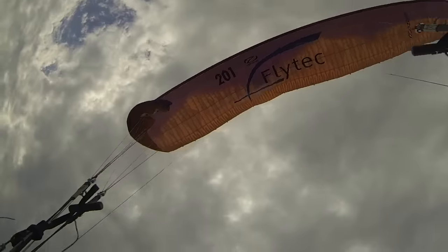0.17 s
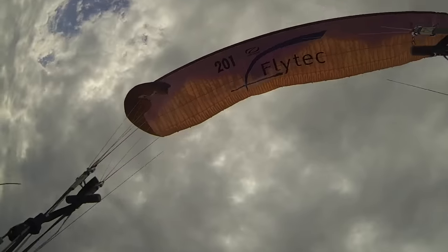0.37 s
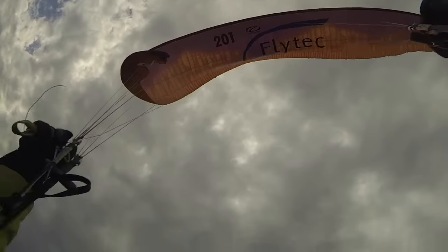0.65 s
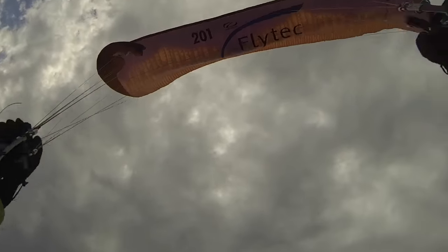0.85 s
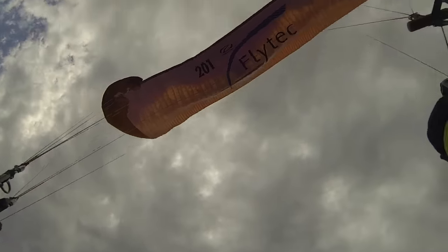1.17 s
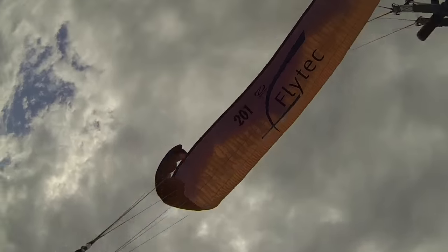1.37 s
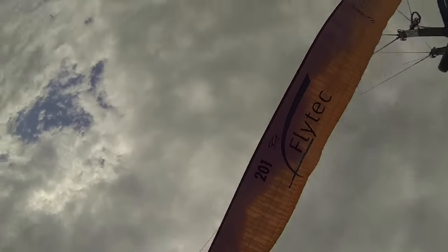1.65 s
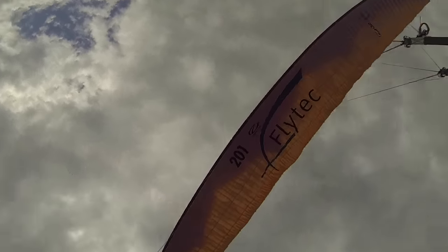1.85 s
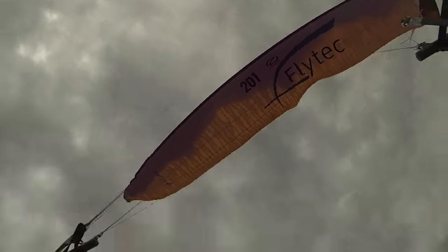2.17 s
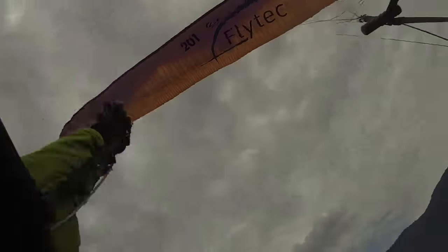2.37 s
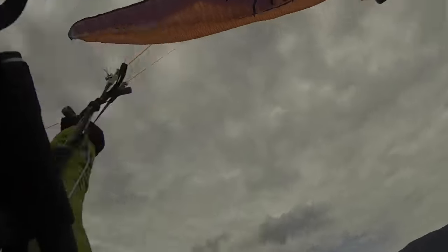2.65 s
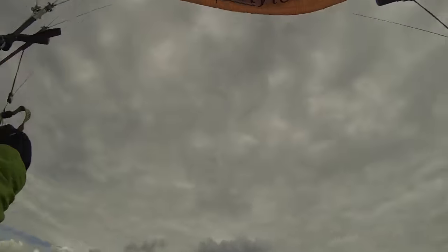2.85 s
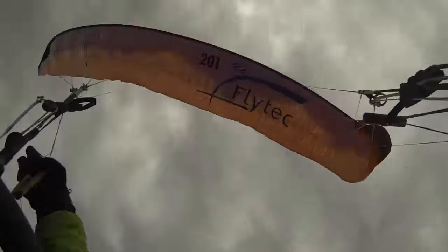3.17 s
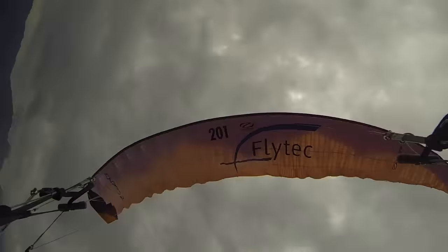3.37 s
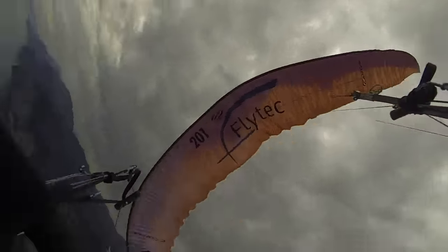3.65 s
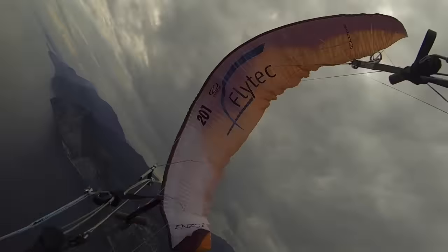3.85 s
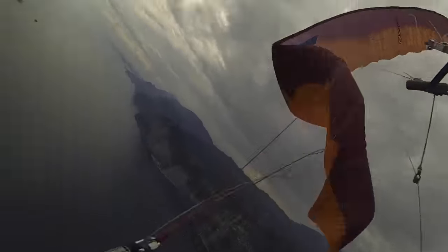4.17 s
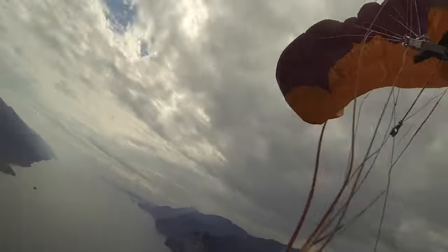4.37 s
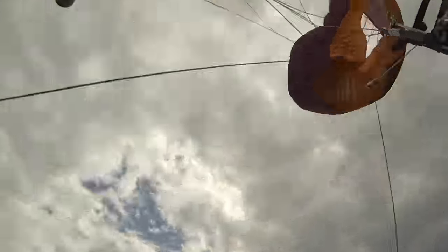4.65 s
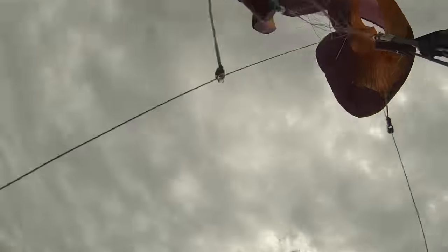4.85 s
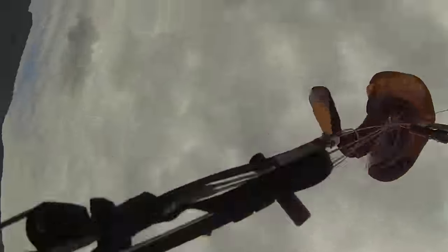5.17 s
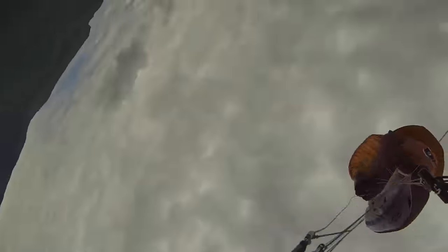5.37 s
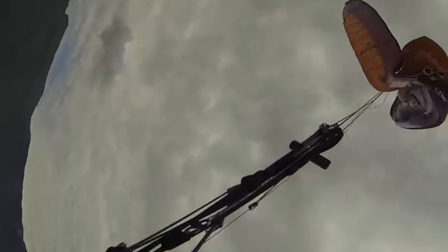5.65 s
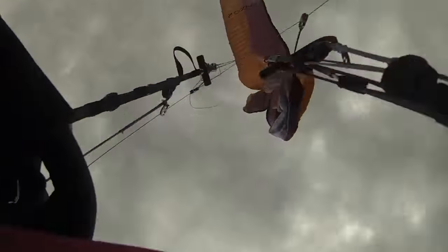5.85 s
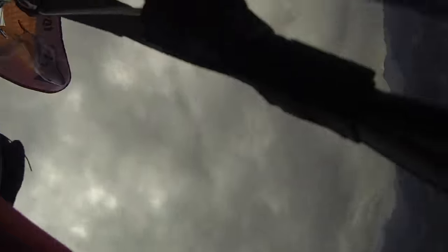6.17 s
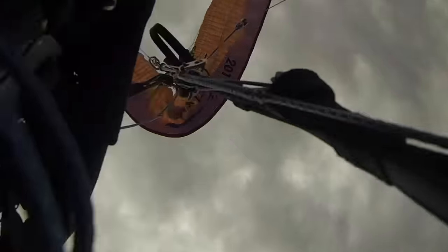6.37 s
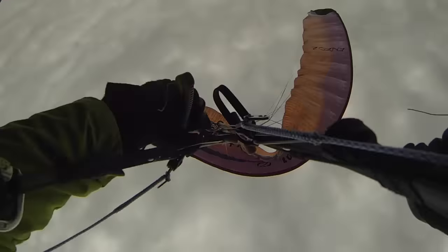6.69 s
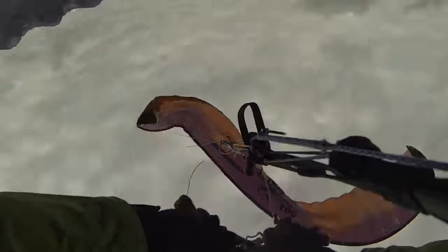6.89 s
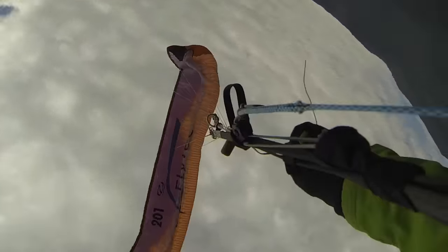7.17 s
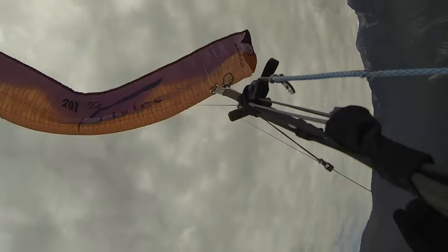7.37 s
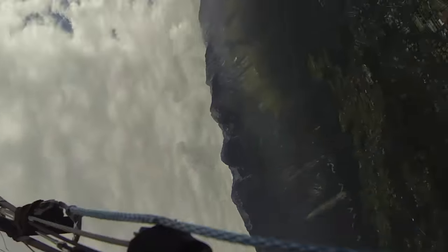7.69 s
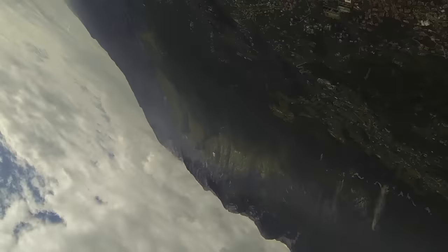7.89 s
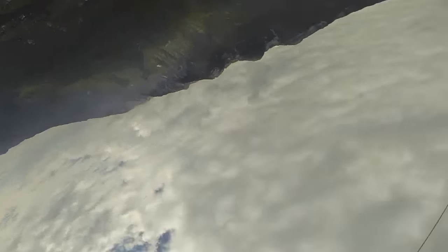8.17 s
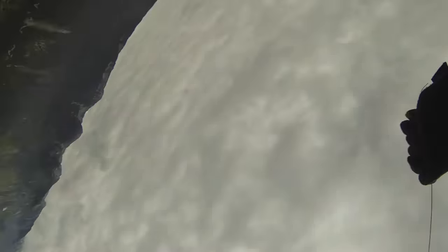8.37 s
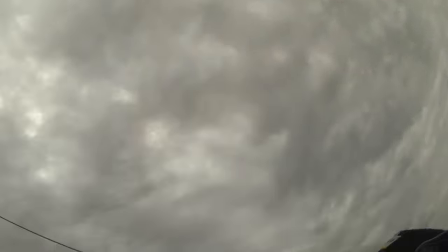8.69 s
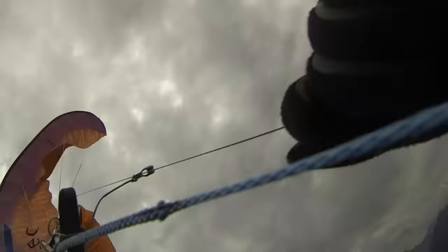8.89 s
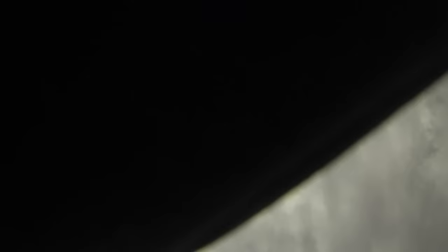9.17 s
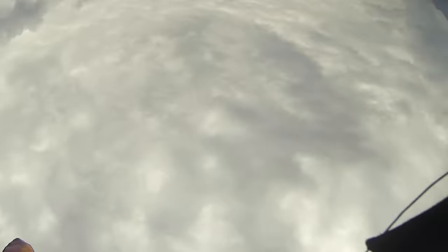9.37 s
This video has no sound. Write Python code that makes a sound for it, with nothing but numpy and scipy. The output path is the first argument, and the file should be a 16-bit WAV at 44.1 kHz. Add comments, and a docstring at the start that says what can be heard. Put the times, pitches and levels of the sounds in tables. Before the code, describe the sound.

Heard from a microphone in a plastic case on a paraglider pilot in open air. Wind rumbles and buffets throughout, its hollow rush surging and dropping. In the first two seconds only a few small groups of dull cloth snaps knock the case, around 0.1-0.3, 1 and 1.7 s, the last with a brief low drone. At 2.4 s a hard snap starts a dense flurry, with short gliding squeaks and scrapes near 2.7 s and a roaring, hissier wind. From 3 s slack cloth flutters in uneven flicks between clustered cracks; a hum swells at 3.7 s. Snaps thin out between 4.3 and 5.5 s, with another drone at 5.3 s, then crowd rapidly from 5.5 to 7 s. Heavy, sharp cracks continue to 9.5 s, some distorted or briefly ringing, with a squeak at 8 s and low drones from 8.2 to 9.1 s.

```python
"""A paraglider wing collapses and flogs in rough air, heard by a microphone in a plastic case on the pilot.
Wind, as coloured noise, buffets the case and rushes throughout; from the start, cloth snaps taut now and then,
each snap a push that excites resonances. The cavity's hum swells into drones, first at about 1.7 s. From about
2.4 s the snaps crowd together and the hardest overload the microphone; rubs follow as gliding squeaks and
scrapes, some snaps leave decaying tones, and from about 3 s slack cloth flutters in trains of uneven flicks."""
import sys
import numpy as np
from scipy import signal
from scipy.fft import rfft, irfft, next_fast_len
from scipy.io import wavfile
from scipy.ndimage import map_coordinates

SR = 44100
rng = np.random.default_rng(int(sys.argv[2]) if len(sys.argv) > 2 else 0)


def master_out(mix):
    """Clip the mix to full scale and print it as 16-bit PCM to the path in sys.argv[1]."""
    frames = np.transpose(np.atleast_2d(mix))
    ceiling = np.clip(frames, -1, 1)
    pcm = np.round(ceiling * 32767).astype(np.int16)
    wavfile.write(sys.argv[1], SR, pcm)


N = 420273
T = np.arange(N) / SR  # time [s]
HIT = 4096  # length of one blow [samples]
AGE = np.arange(HIT) / SR  # time since a blow [s]

# airspeed past the case: (time [s], level of the rush [dB])
AIRSPEED = [(0.0, -15), (0.2, -26.5), (0.45, -39), (0.92, -27.5), (1.35, -44), (1.49, -34.5), (1.82, -21.5),
            (1.93, -48), (2.45, -30.5), (4.2, -39.5), (4.4, -24), (4.8, -26), (4.92, -31), (5.6, -21.5),
            (6.05, -35), (6.2, -24.5), (6.38, -38.5), (6.8, -27), (7.05, -43.5), (7.52, -22.5), (7.7, -51),
            (7.9, -35), (8.5, -39.5), (8.68, -31), (9.08, -53), (9.53, -27.5)]
# turbulence on the case: (time [s], level of the buffeting [dB])
GUSTS = [(0, -18.5), (1.0, -17.5), (1.38, -23.5), (1.58, -13.5), (2.05, -23.5), (3.35, -19.5), (3.85, -26),
         (4.7, -20.5), (6.25, -23.5), (7.1, -34), (7.4, -25), (9.53, -28)]
# the turning airstream: (time [s], drone pitch [Hz], share of glancing flow [0-1])
FLOW = [(2.4, 135, 0.18), (2.48, 132.9, 0.68), (2.7, 134.1, 0.9), (2.78, 135.4, 0.27), (5.7, 136, 0.17),
        (6.3, 114.7, 0.48), (8.3, 119, 0.51), (8.6, 102.5, 0.61)]
# air whistling across the case's rim: (time [s], level before the eddies [dB])
WHISTLE = [(0, -54), (0.45, -61.5), (2.3, -65), (2.5, -45), (2.88, -42.5), (3.0, -33), (3.22, -46),
           (4.35, -57), (4.5, -49.5), (5.5, -57.5), (8.5, -58), (9.4, -50.5)]
# the cavity catches the flow and drones: (start [s], end [s], level at the crest of the arch [dB])
DRONES = [(1.711, 1.947, -21), (3.653, 3.87, -15.5), (5.213, 5.466, -18.5), (8.222, 8.39, -17.5),
          (8.418, 9.1, -21)]
# noise spectra: (frequency [Hz], relative level [dB])
BUFFET_SPECTRUM = [(10, -23), (22, -5), (31, 6.5), (42, -6), (80, -7.5), (160, -16), (400, -81.5)]
RUSH_SPECTRUM = [(100, -22.5), (200, -1.5), (330, -8), (475, 2), (630, -10), (830, -31), (1280, -21),
                 (1700, -68)]
HISS_SPECTRUM = [(1000, 1.5), (2200, -1.5), (4000, -6.5), (7000, -25.5), (14000, -41.5)]
# spectrum of the sharp edge of a snap or flick: (frequency [Hz], relative level [dB])
EDGE_SPECTRUM = [(2000, -25), (2900, 0), (3700, 3), (4400, -3), (6000, -10.5), (7500, -24), (14000, -29)]
# gear rubbing across the case: (start [s], end [s], level [dB], first pitch [Hz], last pitch [Hz])
RUBS = [(2.628, 2.656, -14.5, 1411, 1035), (2.685, 2.737, -30, 1720, 1180), (2.741, 2.756, -27, 1110, 810),
        (3.994, 4.014, -29.5, 1195, 937), (7.981, 8, -14.5, 1150, 1990)]
# case wall or small fitting left ringing by a snap: (time [s], pitch [Hz], level [dB], t60 [s])
RINGS = [(2.377, 1840, -25.5, 0.086), (4.216, 2014, -13, 0.046), (4.853, 2014, -13.5, 0.037),
         (6.408, 1490, -17, 0.025), (7.38, 3630, -13.5, 0.019), (8.36, 3850, -14, 0.019),
         (8.906, 1740, 0.5, 0.011), (9.408, 2840, -29, 0.045)]
# bursts of flutter: (start [s], end [s], level [dB], pitch of the crackle [Hz])
FLUTTER = [(3.046, 3.191, -23, 1720), (3.271, 3.452, -32, 1220), (3.528, 3.6, -36, 1600),
           (3.805, 3.845, -28, 1900), (5.558, 5.641, -23.5, 1250), (5.661, 5.685, -23, 1310),
           (5.716, 5.779, -28, 1320), (5.855, 5.897, -24, 1310), (5.916, 6.016, -28, 1300),
           (6.162, 6.29, -33, 1330), (6.79, 6.856, -30.5, 2350), (7.55, 7.61, -22, 1284),
           (8.634, 8.701, -28, 1520), (9.157, 9.237, -34.5, 1710)]
# cloth and lines snapping taut, levels before the adjustments for flow and hardness:
# (time [s], level of the blow to the case [dB], level of the crack [dB], pitch of the crack [Hz])
SNAPS = [(0.052, -17, -35, 1300), (0.232, -13.5, -26, 1400), (0.328, -16.5, -24.5, 1290),
         (0.926, -9.5, -22, 1140), (0.974, -21.5, -31.5, 1300), (1.025, -13.5, -36, 1290),
         (1.687, -12.5, -48.5, 1240), (1.731, -14, -30, 1320), (1.767, -15, -25, 1280),
         (1.842, -16.5, -26, 1330), (2.36, -1.5, -10.5, 1754), (2.378, -17.5, -15, 2090),
         (2.427, -13, -26, 1310), (2.469, -14, -16.5, 1740), (2.504, -30, -24.5, 2180),
         (2.511, -22.5, -26, 2030), (2.535, -36, -21.5, 1650), (2.56, -18, -19.5, 1260),
         (2.589, -22.5, -16, 1290), (2.66, -12.5, -12, 1820), (3.019, -8.5, -17, 1734),
         (3.029, -9.5, -16, 1674), (3.055, -19, -24, 1740), (3.243, -14, -18.5, 1730),
         (3.281, -14, -18, 1960), (3.308, -21, -23.5, 1710), (3.476, -21, -23.5, 1960),
         (3.512, -14, -24, 2370), (3.655, -7.5, -26.5, 1560), (3.686, -6.5, -25, 1670),
         (3.728, -9.5, -19, 1970), (3.798, -6, -16, 1916), (3.828, -11.5, -19, 1960),
         (3.882, -13, -14.5, 1810), (4.121, -8.5, -20, 1830), (4.201, -11.5, -15, 1850),
         (4.209, -9, -15, 1910), (4.214, -12.5, -22, 1880), (4.852, -8.5, -10, 2120),
         (4.958, -9, -16, 1900), (5.538, -5.5, -14.5, 1850), (5.553, -11, -18.5, 1910),
         (5.703, -21, -20, 2040), (5.713, -12.5, -17, 1880), (5.75, -14, -18, 2040),
         (5.767, -24, -16.5, 1880), (5.814, -9, -13.5, 1930), (5.831, -7.5, -19, 1480),
         (5.874, -10.5, -16, 2070), (5.945, -11.5, -23.5, 2050), (5.977, -7.5, -15.5, 1580),
         (5.983, -19, -17.5, 2040), (6.019, -10, -10, 1384), (6.155, -30, -15.5, 1720),
         (6.197, -12.5, -10, 1836), (6.237, -14, -14, 2020), (6.26, -17, -18, 1610),
         (6.305, -13.5, -15.5, 2085), (6.363, -30, -19, 1406), (6.396, -21, -15, 1390),
         (6.408, -19, -18, 1255), (6.485, -8.5, -17.5, 2050), (6.498, -12, -22.5, 2100),
         (6.513, -12.5, -29, 1390), (6.534, -9.5, -20, 1900), (6.617, -10.5, -16.5, 2400),
         (6.636, -10, -17, 2320), (6.644, -17, -20.5, 2470), (6.661, -14, -21.5, 1980),
         (6.684, -25, -29.5, 2570), (6.71, -18, -21.5, 2620), (6.732, -12.5, -19.5, 2060),
         (6.832, -18, -28, 2550), (6.854, -14, -22.5, 2460), (6.869, -13.5, -20.5, 2660),
         (6.921, -12.5, -23.5, 1660), (6.976, -11.5, -36, 1530), (7.114, -10.5, -18, 1190),
         (7.224, -10, -10.5, 1615), (7.324, -9, -11.5, 1985), (7.379, -14, -16.5, 2170),
         (7.509, -4, -14.5, 1590), (7.606, -7, -12.5, 1440), (7.618, -25, -15.5, 1690),
         (7.63, -28, -14.5, 1650), (7.65, -21, -16, 1810), (7.772, -8, -11.5, 1730),
         (7.802, -14, -14, 1880), (7.953, -8, -9, 1855), (7.975, -8, -9.5, 1610),
         (8.178, -9.5, -13.5, 1580), (8.189, -15, -20, 2230), (8.207, -21, -22, 1520),
         (8.25, -19, -24.5, 1790), (8.354, -11, -25, 3000), (8.376, -16, -18.5, 1920),
         (8.626, -6.5, -13.5, 1695), (8.703, -18, -25, 1750), (8.778, -8.5, -11, 1600),
         (8.841, -18, -26, 1321), (8.859, -18.5, -15.5, 1310), (8.907, -18.5, -19, 1610),
         (8.95, -10.5, -17.5, 1520), (8.97, -16, -14, 1750), (9.031, -15, -19.5, 1570),
         (9.047, -19, -23, 1610), (9.142, -8.5, -10.5, 1800), (9.209, -12.5, -18.5, 2140),
         (9.277, -19.5, -21.5, 1790), (9.289, -7.5, -13.5, 1730), (9.342, -23, -26.5, 2044),
         (9.41, -14.5, -23, 1970), (9.488, -9, -14.5, 1950)]
# case resonances below the top one: (frequency [Hz], width of a single pass [Hz], level [dB])
CASE = [(1288, 296, 5), (2098, 265, 7.5), (2822, 220, -13)]
# top resonance, shifting as the mount is loaded: (time [s], frequency [Hz])
TOP_TUNING = [(5.7, 3297), (5.95, 3565), (8.9, 3540), (9.25, 3430)]
# where the case is driven: (time [s], share of second resonance against first [0-1], drive of top one [dB])
STRIKE = [(2.25, 0.09, -8), (2.38, 0.5, -6.5), (2.6, 0, 1), (3.05, 0.77, -4.5), (3.28, 0.47, -5),
          (4.2, 0.83, -18.5), (5.85, 0.87, -10), (6.38, 0, -5.5), (6.62, 0.1, 0), (7.55, 0.4, 3.5),
          (7.7, 0.15, -1), (9.4, 0.7, -16.5)]
# dead spots between the resonances: (frequency [Hz], width [Hz], depth in head-on flow [0-1])
NOTCHES = [(845, 220, 0.98), (2466, 660, 0.95), (3080, 140, 0.4), (4190, 290, 0.6)]

# wind: rush and base hiss at an ordinary airspeed [dB]; growth of hiss [dB per dB of rush]
CRUISE_DB, HISS_DB, HISS_GROWS = -33.5, -48, 0.48
HUM_DB, HUM_GROWS = -28.5, 0.62  # cavity hum at that airspeed [dB]; growth [dB per dB of rush]
SLOW_EDDY_DB, FAST_EDDY_DB, EDDY_TOP_DB = 5.5, 5.5, 7  # depths of the eddies; ceiling of their sum [dB]
WAKE_DB, WAKE_S = -9.5, 0.012  # air stirred by a snap, against its blow [dB]; fall by 1/e [s]
WHISTLE_HZ, WHISTLE_WIDTH_HZ = 2115, 240
SQUEAK_DB = -11  # level of a rub that is half squeak, half scrape
# case: detuning from blow to blow [share]; width of the top resonance [Hz] and its level [dB]
FLEX, TOP_WIDTH_HZ, TOP_DB = 0.016, 256, -2.5
DEAD_FADE = 1.78  # loss of the dead spots per unit share of glancing flow
HOLLOW_DB = 9  # swing between ring and crack from head-on to glancing flow, on each
# flutter: typical flicks a second at level FLOG_DB; growth [dB of rate per dB of level]
FLICK_HZ, FLICK_GROWS, FLOG_DB = 195.6, 0.45, -25
# snaps: thump and knock against the blow in head-on flow [dB]; heave of the mount against the thump [dB]
THUMP_DB, KNOCK_DB, HEAVE_DB = -7.5, -1, -14.5
GLANCE_DB = 10.5  # fully glancing flow raises the thump and lowers the knock by this
HARD_DB, CRACK_GROWS, EDGE_GROWS = -13.5, 0.62, 0.6  # a hard crack [dB]; extra dB per dB above it
# an ordinary crack [Hz]; per octave above it: more edge, more top resonance, less crack [dB]
MID_HZ, EDGE_DB_PER_OCT, TOP_DB_PER_OCT, CRACK_DB_PER_OCT = 1867, 15.5, 15.5, 10.5
TOP_HZ = 15600  # band limit of the microphone


def amp(db):
    """Logarithmic level: decibels to gain."""
    return 10 ** (np.asarray(db) / 20)


def unit(x):
    """Normalisation by power: scale to rms 1."""
    return x / np.sqrt(np.mean(np.abs(x) ** 2) + 1e-20)


def curves(rows):
    """Linear interpolation: one value per sample for each column after the time."""
    times, *columns = np.transpose(rows)
    return [np.interp(T, times, column) for column in columns]


def at(rows, s):
    """Linear interpolation: the value of each column at one moment."""
    times, *columns = np.transpose(rows)
    return [np.interp(s, times, column) for column in columns]


def wobble(rate, size=N):
    """Band-limited random variation: a smooth curve through rate knots a second."""
    knots = rng.standard_normal(int(size * rate / SR) + 4)
    return map_coordinates(knots, [T[:size] * rate])


def filtered(x, response):
    """Convolution theorem: the spectrum of x times a complex response of frequency."""
    m = next_fast_len(len(x) + HIT)
    spectrum = rfft(x, m) * response(np.fft.rfftfreq(m, 1 / SR))
    return irfft(spectrum, m)[:len(x)]


def shape(points):
    """Minimum phase: folding the cepstrum makes a causal response through (Hz, dB) points."""
    f, db = np.transpose(points)

    def response(hz):
        gain = amp(np.interp(np.log(hz + 1), np.log(f), db))
        cepstrum = irfft(np.log(gain))
        half = len(cepstrum) // 2
        cepstrum[1:half] *= 2
        cepstrum[half + 1:] = 0
        return np.exp(rfft(cepstrum))
    return response


def mode(hz, width):
    """Damped harmonic oscillator: the response of one resonance."""
    return lambda f: 1j * f * width / (hz * hz - f * f + 1j * f * width)


def band(hz, width):
    """Cascaded resonators: one resonance applied twice for steep skirts."""
    return lambda f: mode(hz, width)(f) ** 2


def muffled(response):
    """Transmission loss: the case wall blocks the treble steeply above 2500 Hz."""
    wall = signal.butter(5, 2500, analog=True)
    return lambda f: response(f) * signal.freqs(*wall, f)[1]


def noise(response):
    """Subtractive synthesis: white noise coloured by a response, at rms 1."""
    return unit(filtered(rng.standard_normal(N), response))


def airspeed_db():
    """Addition of powers: the rush follows the airspeed and swells in the wake of every snap."""
    t = T[::64]  # a coarse grid is enough for the wakes
    wake = np.zeros(len(t))
    for s, blow_db, *_ in SNAPS:
        wake += amp(blow_db + WAKE_DB) * (t > s) * np.exp(-np.abs(t - s) / WAKE_S)
    rush_db, = curves(AIRSPEED)
    return 10 * np.log10(amp(rush_db) ** 2 + np.interp(T, t, wake) ** 2)


def eddies():
    """Turbulence on two time scales: a random level in dB whose peaks saturate."""
    level = SLOW_EDDY_DB * wobble(22) + FAST_EDDY_DB * wobble(130)
    return np.minimum(level, EDDY_TOP_DB * np.tanh(level / EDDY_TOP_DB))


def buffeting():
    """Turbulent pressure on the case: low-pitched noise that follows the gusts."""
    level_db, = curves(GUSTS)
    return amp(level_db) * noise(shape(BUFFET_SPECTRUM))


def droning(speed_db, drone_hz):
    """Cavity resonance: a randomly modulated hum, plus steadier swells that rise and fall in an arch."""
    swirl = unit(wobble(22) + 1j * wobble(22))  # wavers in amplitude and phase
    swells = np.zeros(N)
    for start, end, db in DRONES:
        progress = np.clip((T - start) / (end - start), 0, 1)
        swells += amp(db) * np.sin(np.pi * progress)
    strength = amp(HUM_DB + HUM_GROWS * speed_db) * swirl + swells * (1 + 1.12 * swirl)
    return np.real(strength * np.exp(2j * np.pi * np.cumsum(drone_hz) / SR))


def whistle(eddies_db):
    """Edge tone at the rim: narrow-band noise, half as deep in the eddies as the rush."""
    level_db, = curves(WHISTLE)
    return amp(level_db + eddies_db / 2) * noise(band(WHISTLE_HZ, WHISTLE_WIDTH_HZ))


def case_wind():
    """Continuous excitation: noise sounds the case's resonances while the drive of each drifts."""
    bright, top_db = curves(STRIKE)
    bright = np.clip(bright, 0, 1)
    drives = [np.sqrt(1 - bright), np.sqrt(bright), 1, amp(top_db)]
    mean_top_hz = np.mean(TOP_TUNING, axis=0)[1]
    modes = [*CASE, (mean_top_hz, TOP_WIDTH_HZ, TOP_DB)]
    total = np.zeros(N)
    for drive, (hz, width, db) in zip(drives, modes):
        total += amp(db) * drive * filtered(rng.standard_normal(N), band(hz, width))
    return unit(total)


def wind():
    """Incidence of flow: head-on air sounds hollow and rings the case; glancing air roars and hisses."""
    rush_db = airspeed_db()
    speed_db = rush_db - CRUISE_DB
    hiss_db = HISS_DB + HISS_GROWS * speed_db
    drone_hz, glancing = curves(FLOW)
    glancing = np.clip(glancing, 0, 1)
    head_on_gain = np.sqrt(1 - glancing)
    eddies_db = eddies()
    hollow = head_on_gain * noise(shape(RUSH_SPECTRUM))
    roar = np.sqrt(glancing) * noise(muffled(band(250, 320)))
    ringing = amp(-4.0) * head_on_gain * case_wind()
    hiss = glancing * noise(shape(HISS_SPECTRUM))
    rush = amp(rush_db + eddies_db) * (hollow + roar)
    treble = amp(hiss_db + eddies_db / 2) * (ringing + hiss)
    return buffeting() + droning(speed_db, drone_hz) + whistle(eddies_db) + rush + treble


def rubs():
    """Stick-slip friction: webbing on the case mostly scrapes when soft, squeaks at a gliding pitch when loud."""
    out = np.zeros(N)
    scrape = amp(-5.5) * noise(shape(HISS_SPECTRUM)) + amp(2.5) * noise(muffled(band(900, 1100)))
    for start, end, db, first_hz, last_hz in RUBS:
        span = slice(round(start * SR), round(end * SR))
        progress = np.linspace(0, 1, len(T[span]))
        hz = first_hz + (last_hz - first_hz) * progress
        phase = 2 * np.pi * np.cumsum(hz) / SR
        grip = [wobble(520, len(progress)) for _ in range(2)]  # roughens the tone
        slip = grip[0] * np.sin(phase) + grip[1] * np.cos(phase)
        squeak = 1 / (1 + amp((SQUEAK_DB - db) / 2))  # share of the squeak
        stroke = amp(db) * 2 * np.sqrt(progress * (1 - progress))
        out[span] += stroke * (2 * squeak * slip + (1 - squeak) * scrape[span])
    return out


def rings():
    """Free decay: short tones, slightly rough in phase, linger after some of the snaps."""
    out = np.zeros(N + HIT)
    for s, hz, db, t60 in RINGS:
        drift = 0.013 * np.cumsum(rng.standard_normal(HIT))  # radians
        envelope = amp(db - 60 * AGE / t60) * (1 - np.exp(-AGE / 0.00084))
        out[round(s * SR):][:HIT] += 2 * envelope * np.sin(2 * np.pi * hz * AGE + drift)
    return out[:N]


def case(x, bright, top_db, top_hz):
    """Modal superposition: x rings the case; bright shifts energy from its lowest resonance to the next."""
    bright = np.clip(bright, 0, 1)
    drive = [np.sqrt(1 - bright), np.sqrt(bright), 1, amp(top_db)]
    modes = [*CASE, (top_hz, TOP_WIDTH_HZ, TOP_DB)]
    tuning = 1 + FLEX * rng.standard_normal()  # the case flexes

    def response(f):
        total = 0
        for k, (hz, width, db) in enumerate(modes):
            sign = (-1) ** k  # neighbouring modes have opposite polarity
            total = total + sign * amp(db) * drive[k] * band(tuning * hz, width)(f)
        return total
    return filtered(x, response)


def jolt(t60, grit):
    """Impulsive excitation: a sharp push with a short decaying scrape."""
    scrape = unit(rng.standard_normal(HIT) * amp(-60 * AGE / t60))
    push = grit * scrape / np.sqrt(HIT)
    push[0] -= 1
    return push


def flutter():
    """Aeroelastic flutter: uneven flicks, quicker in louder bursts, rattle the case's resonances."""
    out = np.zeros(N + SR)
    for start, end, db, hz in FLUTTER:
        chance = rng.standard_normal((96, 2))  # timing and size of each flick
        rate = FLICK_HZ * amp(FLICK_GROWS * (db - FLOG_DB))
        gaps = np.exp(0.39 * chance[:, 0]) / rate
        times = np.cumsum(gaps) - gaps[0]
        inside = times <= abs(end - start)
        sizes = unit(amp(3.45 * chance[inside, 1]))
        flicks = np.zeros(SR // 2)
        for s, size in zip(times[inside], sizes):
            flicks[round(s * SR):][:HIT] += amp(db) * size * jolt(t60=0.016, grit=0.83)
        bright, top_db = at(STRIKE, start)
        _, glancing = at(FLOW, start)
        hollow_db = HOLLOW_DB * (0.3 - glancing)
        knock = amp(44.5) * filtered(flicks, muffled(band(327, 530)))
        ring = amp(39.5 + hollow_db) * case(flicks, bright, top_db, *at(TOP_TUNING, start))
        crack = amp(37.0 - hollow_db) * filtered(flicks, muffled(band(hz, 550)))
        edge = amp(19.0) * filtered(flicks, shape(EDGE_SPECTRUM))
        out[round(start * SR):][:len(flicks)] += knock + ring + crack + edge
    return out[:N]


def struck(push, response):
    """Impact response: what a push rings, at rms 1 over its first hundredth of a second."""
    ring = filtered(push, response)
    return ring / np.sqrt(np.mean(ring[:SR // 100] ** 2) + 1e-20)


def snaps():
    """Impact of cloth pulled taut: a swish, then heave, thump, knock, crack and edge; a rebound rings the case.

    Harder snaps are sharper; glancing flow turns the knock into a thump and the ring into a crack."""
    out = np.zeros(N + 2 * HIT)
    for s, blow_db, crack_db, hz in SNAPS:
        start = round(s * SR)
        bright, top_db = at(STRIKE, s)
        _, glancing = at(FLOW, s)
        hollow_db = HOLLOW_DB * (0.3 - glancing)
        thump_db = blow_db + THUMP_DB + GLANCE_DB * glancing
        knock_db = blow_db + KNOCK_DB - GLANCE_DB * glancing
        hard_db = crack_db - HARD_DB
        octaves = np.log2(hz / MID_HZ)
        edge_db = crack_db + EDGE_GROWS * hard_db + 0.23 * top_db + EDGE_DB_PER_OCT * octaves
        sharp_db = CRACK_GROWS * hard_db - hollow_db - CRACK_DB_PER_OCT * max(octaves, 0)
        top_db = top_db + TOP_DB_PER_OCT * octaves

        push = jolt(t60=0.015, grit=0.84)
        thump = amp(thump_db) * struck(jolt(t60=0.016, grit=1.0), muffled(band(106.7, 174)))
        heave = amp(thump_db + HEAVE_DB) * struck(push, muffled(band(60, 59)))
        knock = amp(knock_db) * struck(push, muffled(band(373.6, 257)))
        crack = amp(crack_db + sharp_db - 4.0) * struck(push, muffled(band(0.891 * hz, 0.57 * hz)))
        ring = unit(case(jolt(t60=0.033, grit=0.58), bright, top_db, *at(TOP_TUNING, s)))
        ring = ring * np.sqrt(SR / 100 / HIT)  # energy of rms 1 over a hundredth of a second
        ring = amp(crack_db + hollow_db - 3.5) * ring
        rebound = round(abs(0.001504 * rng.standard_normal()) * SR)  # delay in samples
        ring = np.pad(ring, (rebound, 0))[:HIT]
        edge = amp(edge_db - 10.5) * struck(jolt(t60=0.014, grit=4.0), shape(EDGE_SPECTRUM))
        rustle = unit(filtered(rng.standard_normal(HIT), band(850, 610)))
        swish = amp(knock_db - 28.0 - 60 * AGE / 0.1) * rustle
        out[start:][:HIT] += swish[::-1]  # reversed: swells towards the snap
        out[start + HIT:][:HIT] += heave + thump + knock + crack + edge + ring
    return out[HIT:][:N]


def dead_spots(x):
    """Antiresonance: in head-on flow the case lets little sound through between its resonances."""
    head_on = np.clip(1 - DEAD_FADE * curves(FLOW)[1], 0, 1)
    for hz, width, depth in NOTCHES:
        x = x - np.clip(depth, 0, 1) * head_on * filtered(x, mode(hz, width))
    return x


def scene():
    """Superposition: wind, snaps and flutter pass the dead spots; rubs and rings come straight through the wall."""
    through_case = dead_spots(wind() + snaps() + flutter())
    return (through_case + rubs() + rings())[None]


def record(dry):
    """Saturation: the microphone overloads at full scale; its treble droops towards the band limit."""
    hardness = 10  # sharpness of the knee
    clipped = dry[0] / (1 + np.abs(dry[0]) ** hardness) ** (1 / hardness)
    return filtered(clipped, lambda hz: (hz < TOP_HZ) / np.sqrt(1 + (hz / 12500) ** 10))[None]


dry = scene()
out = record(dry)
master_out(out)
```